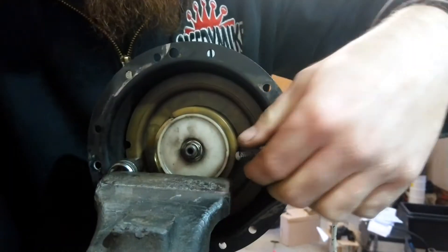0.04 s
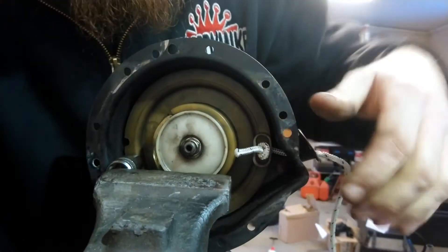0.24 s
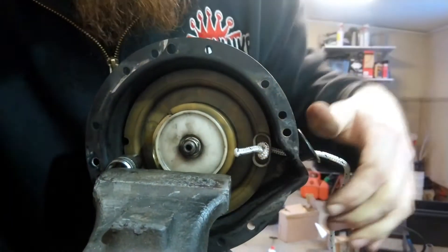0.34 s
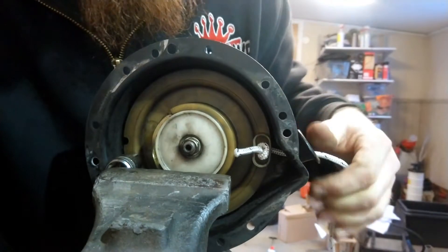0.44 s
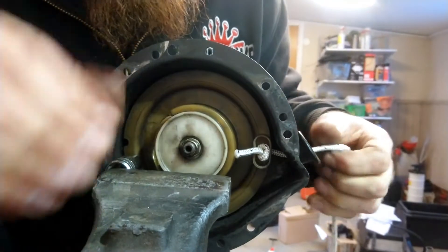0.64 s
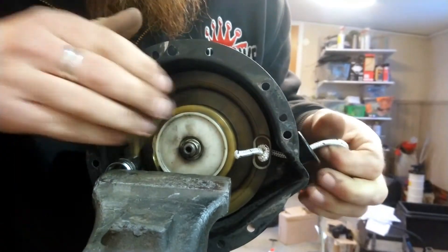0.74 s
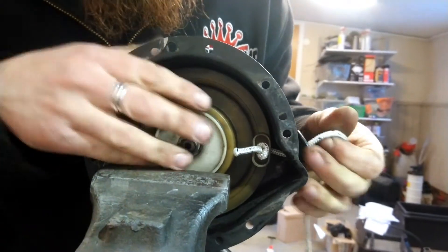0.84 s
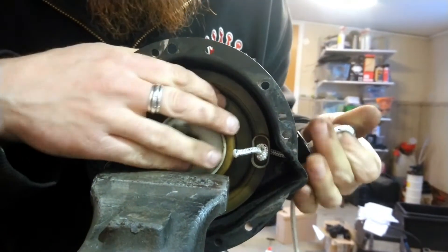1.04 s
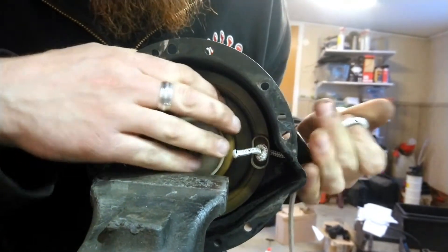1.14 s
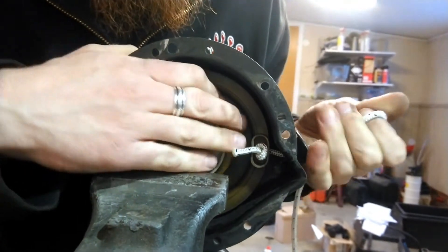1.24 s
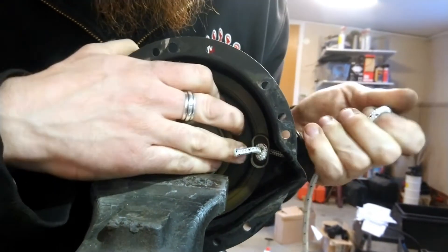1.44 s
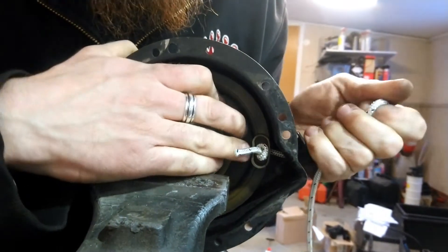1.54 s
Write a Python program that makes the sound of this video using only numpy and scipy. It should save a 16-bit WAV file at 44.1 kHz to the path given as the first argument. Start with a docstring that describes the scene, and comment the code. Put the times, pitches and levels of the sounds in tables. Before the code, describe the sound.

A pull starter pulley knocks hollowly at 0.2 seconds, briefly ringing its metal housing. The rope drags with a short groan and a tiny tick, ending in a quick double clunk near 0.4 seconds. From about 0.9 to 1.6 seconds, a palm rubs the housing with a soft rumble while rope slides through a hand in a faint, grainy hiss. All is close, over a faint workshop hum.

```python
"""The pulley of a recoil starter knocks as its rope is let back, close up in a small workshop. Each blow rings
the housing, held in a vice. The rope drags, the pulley groans and a pawl ticks. Then a palm settles on it with
a soft rumble and the rope slides through the other hand in a fine, grainy hiss, over a faint hum."""
import sys
import numpy as np
from scipy import signal
from scipy.fft import rfft, irfft, next_fast_len
from scipy.io import wavfile
from scipy.ndimage import uniform_filter1d

SR = 44100
rng = np.random.default_rng(int(sys.argv[2]) if len(sys.argv) > 2 else 0)


def digitize_waveform(pressure):
    """Quantize a signal to 16-bit integers and store it at the path in sys.argv[1].

    Rows of a 2-D input are taken as channels; values are limited to [-1, 1].
    """
    field = np.atleast_2d(pressure).T
    bounded = np.clip(field, -1, 1)
    quanta = np.round(bounded * 32767).astype(np.int16)
    wavfile.write(sys.argv[1], SR, quanta)


N = 70560
T = np.arange(N) / SR

# pulley hits (time [s], clunk level [dB], clunk pitch [Hz], clunk t60 [s], attack [s],
# housing bass [dB], housing middle [dB], housing treble [dB], crack level [dB])
PULLEY_HITS = [(0.2052, -6, 498, 0.024, 0.0037, -39.5, -62, -19, -43.5),
               (0.3619, -12.5, 320, .018, 0.00059, -22.5, -33.5, -30.5, -36.5),
               (0.3774, -20, 469, 0.017, 0.003, -27.5, -63.5, -23, -39.5),
               (0.3826, -3, 449, 0.022, 0.00092, -46.5, -30.5, -24.5, -39.5),
               (0.6461, -39, 364, 0.025, 0.0028, -70, -72, -84, -86)]
# ring of the housing in its vice (frequency [Hz], level [dB], t60 [s])
HOUSING_MODES = [(70, -35.5, 0.073), (100.3, -11, 0.36), (161.3, 1.5, 0.09), (241.7, -5.5, 0.32),
                 (307.5, -19.5, 0.35), (337, -10, .3), (398, -3.5, 0.11), (445.6, -1.5, 0.16),
                 (470, -2.5, .45), (489, -6, 0.26), (624, 1, 0.062), (797, 3, 0.035), (927, -5.5, 0.031),
                 (1204, 2.5, 0.023), (1279, -18, 0.0335), (1585, -19.5, 0.06), (1872, -18, 0.057)]
# tone of the crack on each hit (frequency [Hz], gain [dB])
CRACK_EQ = [(100, -8.5), (700, -5.5), (1300, -1), (1600, 3.5), (2000, 3.5), (2500, -5), (3200, -4.5),
            (4200, -9), (7000, -13), (10000, -29), (16000, -35)]
BASS_HZ, MIDDLE_HZ, TREBLE_HZ, CRACK_DECAY_S = 136.5, 372, 880, .005

def pulley_knocks():
    """Each blow gives a short hollow clunk of the pulley, a crack, and sets the housing ringing."""
    out, t = np.zeros((2, N)), T[:SR * 3 // 4]
    for start, db, pitch, t60, attack, bass_db, middle_db, treble_db, crack_db in PULLEY_HITS:
        strike_eq = [(BASS_HZ, bass_db), (MIDDLE_HZ, middle_db), (TREBLE_HZ, treble_db)]
        clunk = amp(db - 60 * t / t60) * np.sin(2 * np.pi * pitch * t)
        ring = sum(amp(mode_db + lookup(strike_eq, hz) - 60 * t / mode_t60) * np.sin(2 * np.pi * hz * t)
                   for hz, mode_db, mode_t60 in HOUSING_MODES)
        crack = amp(crack_db) * stereo_noise(CRACK_EQ, len(t)) * np.exp(-t / CRACK_DECAY_S)
        add(out, start, (clunk + ring) * (1 - np.exp(-t / attack)) + crack)
    return out


# ticks of pawl and rope (time [s], level [dB], rise [s])
TICK_HITS = [(0.2235, -69, 0.0031), (0.2305, -54, 0.0012), (0.3515, -35.5, 0.0027), (0.4965, -64, 0.0011),
             (0.557, -67, 0.0016)]
# their bright, glassy tone (frequency [Hz], gain [dB])
TICK_EQ = [(300, -26), (3000, -18.5), (4100, 11), (4700, 5.5), (5300, 17.5), (6300, -0.5), (7400, 11),
           (9500, -10.5), (16000, -17.5)]

def pawl_ticks():
    """Pawl and rope make tiny bright scrapes, a few milliseconds long."""
    out, t = np.zeros(N), T[:SR // 10]
    for start, db, rise in TICK_HITS:
        scrape = unit(eq(rng.standard_normal(len(t)), TICK_EQ))
        envelope = t / rise * np.exp((1 - (t / rise) ** 2) / 2)
        add(out, start, amp(db) * scrape * envelope)
    return out


# envelope of the rope dragging on the pulley (time [s], level [dB])
DRAG_ENVELOPE = [(0, -52.5), (.085, -62.5), (.125, -50), (.16, -58), (.195, -70), (.23, -43), (.29, -53),
                 (.318, -41), (.355, -39.5), (.38, -49), (.45, -83)]
# resonances stirred by the drag (frequency [Hz], width [Hz], gain [dB])
DRAG_MODES = [(306, 70, 0), (427, 20, 19.5), (472, 160, 2), (790, 51, -21.5), (1100, 68, -19)]

def rope_drag():
    """Small slips of the rope stir the pulley's resonances."""
    body = lambda hz: sum(amp(db) / (1 + 1j * (hz ** 2 - centre ** 2) / (width * hz + 1))
                          for centre, width, db in DRAG_MODES)
    slips = grains(per_s=2500, spread_db=1.5)
    rasp = unit(shape(slips, lambda hz: body(hz) / (1 + 1j * hz / 1810)))  # low-pass softens the slips
    running_rms = np.sqrt(abs(uniform_filter1d(rasp ** 2, size=1300)) + 1e-6)
    return level(DRAG_ENVELOPE) * rasp / running_rms


# groan of the turning pulley (time [s], pitch [Hz], level [dB])
GROAN_CURVE = [(.21, 499.9, -50), (.228, 501, -42), (.258, 484.7, -61.5), (.28, 503.3, -40),
               (.297, 494.6, -46), (.318, 507, -37.5), (.333, 468.8, -49), (.348, 456.2, -40.5),
               (.362, 451, -32), (.38, 452, -92.5)]
GROAN_JITTER, GROAN_ROUGH_DB = 0.041, 4

def pulley_groan():
    """The pulley groans while it turns: one tone, unsteady in pitch and level."""
    times, pitches, db = np.transpose(GROAN_CURVE)
    pitch = np.interp(T, times, pitches) * (1 + GROAN_JITTER * wander(rate_hz=46))
    tone = unit(np.sin(2 * np.pi * np.cumsum(pitch) / SR))
    envelope = amp(np.interp(T, times, db) + GROAN_ROUGH_DB * wander(rate_hz=88))
    return envelope * tone * (T > times[0]) * (T < times[-1])


# envelope of rope and sleeve sliding over skin (time [s], relative level [dB])
SLIDE_ENVELOPE = [(0, -61.5), (.178, -64.5), (.226, -55.5), (.26, -62), (.345, -56.5), (.39, -61),
                  (.426, -65.5), (.614, -70), (.67, -67), (.7, -73.5), (.876, -75), (.9, -66.5),
                  (1.028, -62), (1.136, -68), (1.216, -56), (1.27, -62.5), (1.345, -64), (1.4, -63.5),
                  (1.6, -68)]
# tone of the rubbing (frequency [Hz], gain [dB])
SLIDE_EQ = [(40, -30.5), (120, 10), (300, -1), (600, -1), (900, -1), (1500, 0), (2100, -2.5), (2800, -2),
            (3400, -2.5), (5200, -0.5), (6000, -3), (7300, -8), (8000, -20), (8700, -11), (11000, -20),
            (16000, -18)]
# housing resonances under the rubbing (frequency [Hz], width [Hz], gain [dB])
SLIDE_MODES = [(765, 55, 7), (1068, 48, 5), (2170, 170, -3), (3115, 60, 3), (3575, 60, 3), (4505, 67, 4),
               (4890, 85, 6), (5880, 40, 1), (6720, 45, 1), (7050, 70, 2)]
# how firmly the rubbing stirs the housing (time [s], gain [dB])
RING_SEND = [(0, -10), (.85, -6), (.93, 2.5), (1.27, 2), (1.36, -9.5), (1.6, -5)]
# low shelf riding on the rubbing, below SHELF_HZ (time [s], gain [dB])
SLIDE_SHELF = [(0, -3), (.35, -2.5), (.7, -3), (.95, -5.5), (1.03, -8.5), (1.1, -0.5), (1.21, -7.5),
               (1.28, -3), (1.36, -5), (1.6, 1)]
SLIDE_GAIN_DB, SHELF_HZ, CENTRE_SHARE = 7, 2800, 0.29

def rope_slide():
    """Rope and skin rub in dense fine grains, with narrow rings of the housing."""
    centre, left, right = (grains(per_s=18000, spread_db=5) for _ in range(3))
    friction = np.sqrt(CENTRE_SHARE) * centre + np.sqrt(1 - CENTRE_SHARE) * np.array([left, right])
    housing = lambda hz: sum(amp(db) / (1 + 2j * (hz - mode_hz) / width)
                             for mode_hz, width, db in SLIDE_MODES)
    ring = level(RING_SEND) * shape(friction, housing)
    rub = unit(eq(friction + ring, SLIDE_EQ))
    lows = shape(rub, lambda hz: 1 / (1 + (hz / SHELF_HZ) ** 6))
    highs = rub - lows
    return amp(SLIDE_GAIN_DB) * level(SLIDE_ENVELOPE) * (highs + level(SLIDE_SHELF) * lows)


# soft bumps of the hands: the first three as a hand lets go of the rope, the rest on the housing (time [s],
# level [dB], pitch [Hz], swell [s])
HAND_BUMPS = [(0.094, -49.5, 336, 0.023), (0.1, -47.5, 533.6, 0.013), (0.105, -57.5, 776, 0.016),
              (0.895, -52.5, 73.6, 0.033), (1.045, -58, 149.4, 0.048), (1.045, -63, 233.7, 0.017),
              (1.158, -58, 61, 0.017), (1.22, -61, 244, 0.023), (1.24, -59, 86.4, 0.016)]
# envelope of the palm pressing on the housing (time [s], level [dB])
PALM_ENVELOPE = [(0, -69), (.19, -59), (.6, -61), (.72, -74.5), (.88, -73), (.915, -76), (.97, -70),
                 (1.01, -65), (1.075, -60.5), (1.15, -65), (1.27, -70), (1.35, -66.5), (1.52, -65.5),
                 (1.6, -76)]
# its dark tone (frequency [Hz], gain [dB])
PALM_EQ = [(20, -34.5), (42, -6), (62, 3.5), (105, -5), (200, -15.5), (255, -4), (330, -20.5), (700, -21.5),
           (3000, -59)]

def palm():
    """A hand lets go of the rope with a few soft bumps; later the palm shifts on the housing with a soft rumble
    and more bumps."""
    bumps, t = np.zeros(N), T[:SR // 3]
    for start, db, pitch, swell in HAND_BUMPS:
        envelope = (t / swell) ** 2 * np.exp(2 * (1 - t / swell))
        add(bumps, start, amp(db) * envelope * np.sin(2 * np.pi * pitch * t))
    return bumps + level(PALM_ENVELOPE) * stereo_noise(PALM_EQ, N)


# early reflections off nearby surfaces (delay [s], level [dB])
REFLECTIONS = [(.0088, -21), (0.0176, -15), (0.0208, -37.5)]
# decay of the reverb tail (frequency [Hz], t60 [s])
TAIL_T60 = [(80, 0.49), (250, 0.42), (600, 0.6), (1500, .52), (4000, 0.2), (12000, 0.24)]
# tone of the tail (frequency [Hz], gain [dB])
TAIL_EQ = [(80, -8), (250, -12.5), (450, -11), (800, -9), (2000, -8.5), (6000, -19.5), (14000, -12)]
TAIL_ONSET_S = 0.042

def workshop_reverb(direct):
    """The room adds a few close echoes, then a tail in which each band dies at its own speed."""
    early = direct.copy()
    for delay, db in REFLECTIONS:
        add(early, delay, amp(db) * direct)
    hz, t, bands = signal.stft(rng.standard_normal((2, SR)), SR, nperseg=256)
    t60 = lookup(TAIL_T60, hz)[:, None]
    equal_energy = np.sqrt(2 * np.log(1000) / (t60 * SR))
    tail = signal.istft(bands * amp(-60 * t / t60) * equal_energy, SR, nperseg=256)[1][:, :SR]
    fade_in = 1 - np.exp(-(T[:SR] / TAIL_ONSET_S) ** 2)
    tail = diffuse(*eq(tail, TAIL_EQ)) * fade_in
    return early + signal.fftconvolve(direct, tail, axes=1)[:, :N]


# swells of the hum (time [s], level [dB])
HUM_ENVELOPE = [(0, -63), (.6, -83), (.8, -76.5), (.95, -65), (1.1, -74), (1.22, -68.5), (1.35, -67.5),
                (1.5, -59.5), (1.6, -77)]
# room tone (frequency [Hz], gain [dB])
AIR_EQ = [(30, -2.5), (70, 7), (200, -4), (330, 9), (600, -24.5), (1200, -8.5), (2500, -8), (5000, -11.5),
          (8000, -15), (12000, -18.5), (15800, -7)]
HUM_HZ, HUM_WAVER_DB, AIR_DB = 155, 1.2, -66

def hum_and_air():
    """A faint wavering hum lies in the still air of the workshop."""
    waver = amp(HUM_WAVER_DB * wander(rate_hz=20))
    hum = level(HUM_ENVELOPE) * waver * unit(np.sin(2 * np.pi * HUM_HZ * T))
    return hum + amp(AIR_DB) * stereo_noise(AIR_EQ, N)


def amp(db):
    """Decibels to gain."""
    return 10 ** (np.asarray(db) / 20)


def unit(x):
    """Scales to rms 1."""
    return x / np.sqrt(np.mean(x ** 2) + 1e-20)


def lookup(points, hz):
    """Reads a table on a log-frequency axis."""
    frequencies, values = np.transpose(points)
    return np.interp(np.log(hz + 1), np.log(frequencies + 1), values)


def level(points):
    """Gain over time from (time [s], level [dB]) points."""
    return amp(np.interp(T, *np.transpose(points)))


def shape(x, response):
    """Filters by a function of frequency."""
    size = next_fast_len(x.shape[-1] + 4096)
    return irfft(rfft(x, size) * response(np.fft.rfftfreq(size, 1 / SR)), size)[..., :x.shape[-1]]


def eq(x, points):
    """Filters by (frequency [Hz], gain [dB]) points."""
    return shape(x, lambda hz: amp(lookup(points, hz)))


def add(mix, start_s, sound):
    """Mixes a sound in at its start time."""
    part = mix[..., max(round(start_s * SR), 0):][..., :sound.shape[-1]]
    part += sound[..., :part.shape[-1]]


def grains(per_s, spread_db):
    """Random clicks of uneven size."""
    size = amp(spread_db * np.minimum(rng.exponential(1, N), 4))
    return unit(size * rng.choice([-1, 1], N) * (rng.random(N) < per_s / SR))


def wander(rate_hz):
    """Smooth random motion up to about the given rate."""
    return unit(shape(rng.standard_normal(N), lambda hz: np.exp(-(hz / rate_hz) ** 2)))


def diffuse(a, b, corner_hz=880):
    """Two noises become a diffuse stereo field: alike in the bass, unrelated in the treble."""
    alike = lambda hz: 1 / (1 + (hz / corner_hz) ** 2)
    mid = shape(a, lambda hz: np.sqrt((1 + alike(hz)) / 2))
    side = shape(b, lambda hz: np.sqrt((1 - alike(hz)) / 2))
    return np.array([mid + side, mid - side])


def stereo_noise(tone, samples):
    """Diffuse noise through an EQ curve, at rms 1."""
    return unit(eq(diffuse(*rng.standard_normal((2, samples))), tone))


# lag of the right channel behind the left (frequency [Hz], delay [s])
RIGHT_LAG = [(80, 0.00057), (250, 0.00032), (430, 0.000082), (560, 0.00047), (800, 0.00017),
             (1200, 0.00022), (1800, 0.0002), (3000, 0.00018), (6000, .00017)]
# tone of the left channel (frequency [Hz], gain [dB])
LEFT_EQ = [(60, 2.5), (200, 3.7), (400, 1.25), (700, 2.2), (1200, 1.5), (2400, 2.5), (4400, -8.5),
           (6500, -2), (7500, 3), (8050, -3), (8600, 3), (15000, -1.5)]
# tone of the right channel (frequency [Hz], gain [dB])
RIGHT_EQ = [(60, 1), (200, 3.25), (400, -3.75), (700, 2), (1200, 0), (2400, 4), (4400, 0.5), (7200, -8.5),
            (8000, -31), (15000, -14.5)]

def scene():
    """The starter sits a little to the left; its mechanism gets reverb, the hands stay dry."""
    mechanism = pulley_knocks() + pawl_ticks() + rope_drag() + pulley_groan()
    left, right = workshop_reverb(mechanism) + rope_slide() + palm()
    right = shape(right, lambda hz: np.exp(-2j * np.pi * hz * lookup(RIGHT_LAG, hz)))
    return np.array([eq(left, LEFT_EQ), eq(right, RIGHT_EQ)]) + hum_and_air()


LOW_CUT_HZ, HIGH_CUT_HZ = 58, 15900

def record(dry):
    """A gentle low cut and a steep high cut on the whole mix."""
    low_cut = signal.butter(2, LOW_CUT_HZ, "high", fs=SR, output="sos")
    high_cut = signal.firwin(511, HIGH_CUT_HZ, window=("kaiser", 9), fs=SR)
    return signal.oaconvolve(signal.sosfilt(low_cut, dry), high_cut[None], "same")


dry = scene()
out = record(dry)
digitize_waveform(out)
```